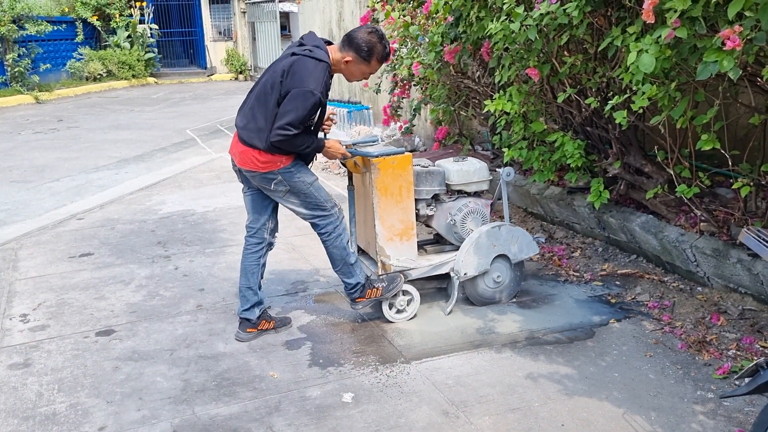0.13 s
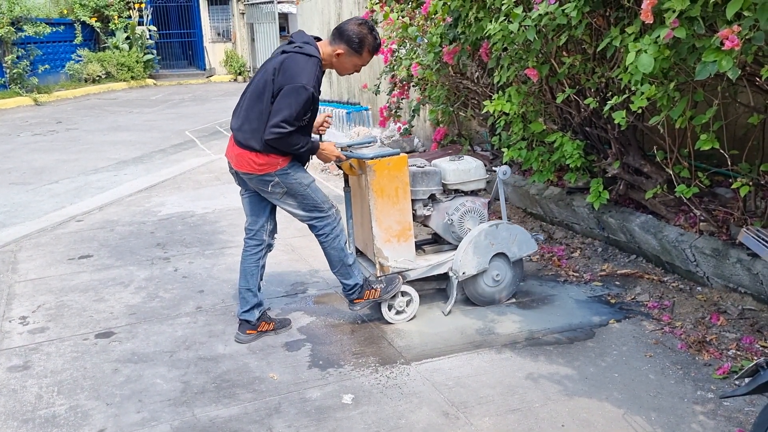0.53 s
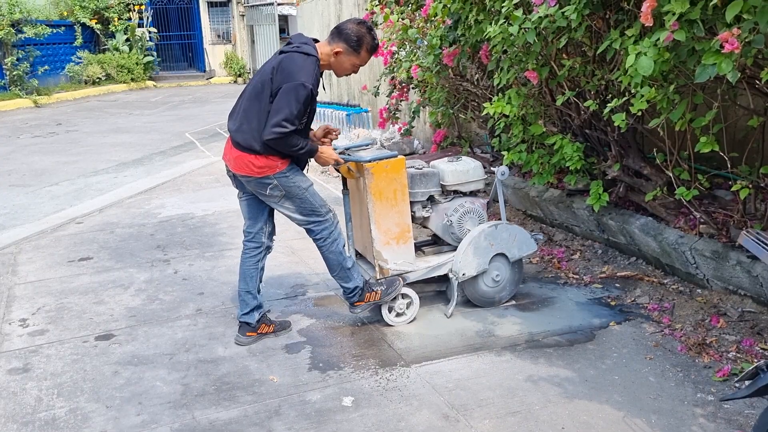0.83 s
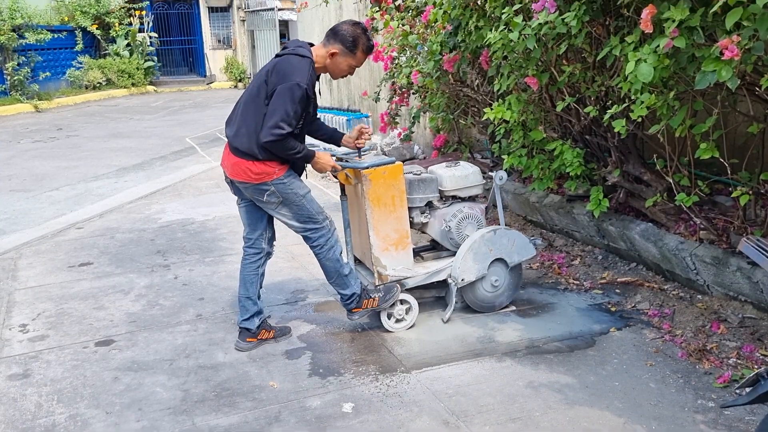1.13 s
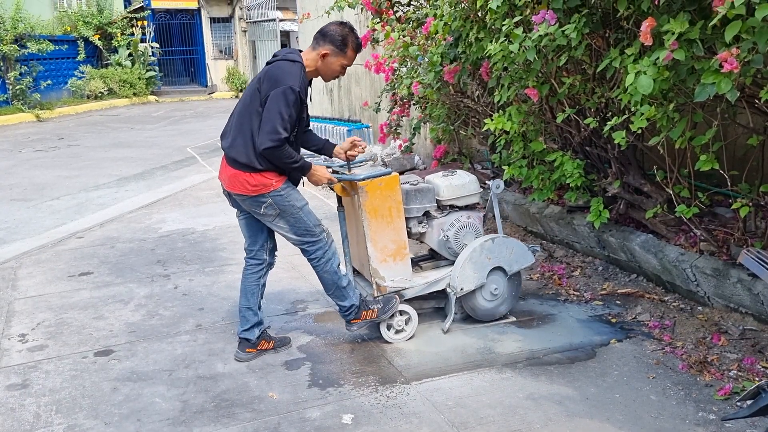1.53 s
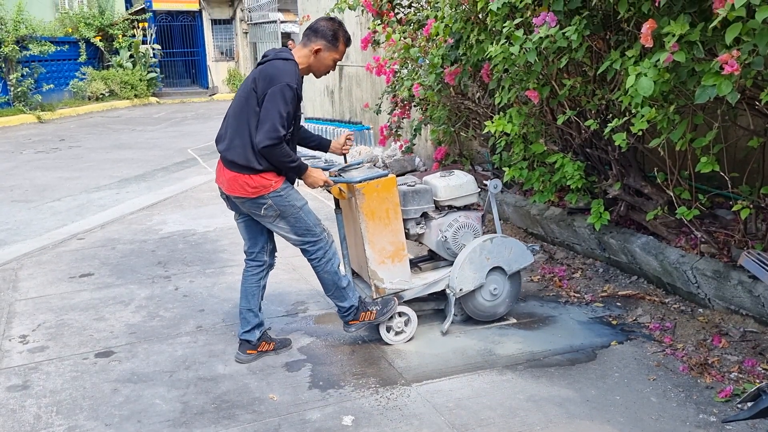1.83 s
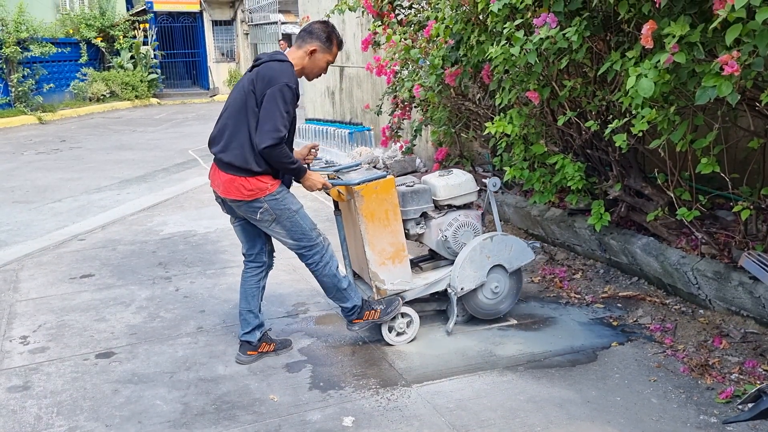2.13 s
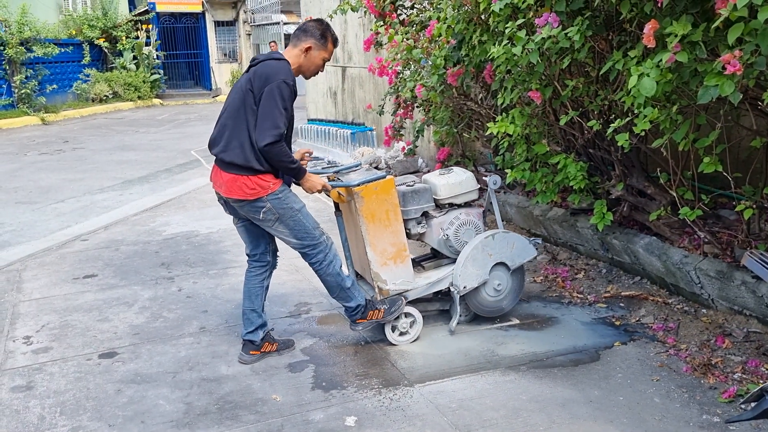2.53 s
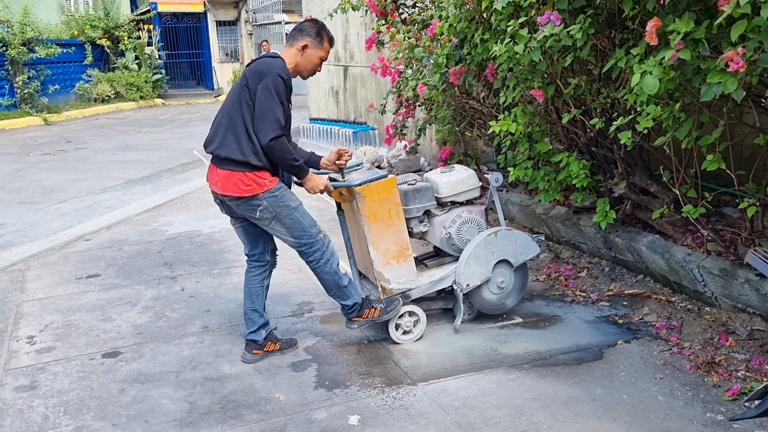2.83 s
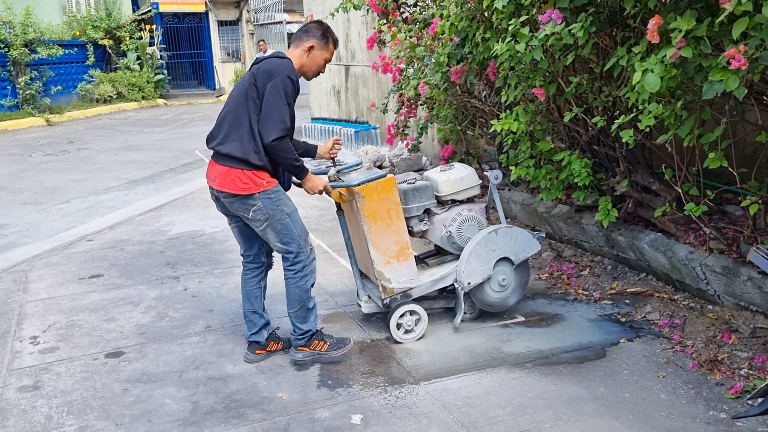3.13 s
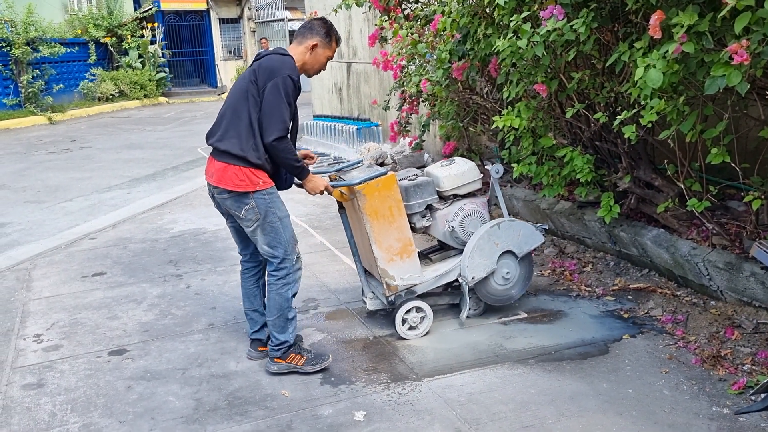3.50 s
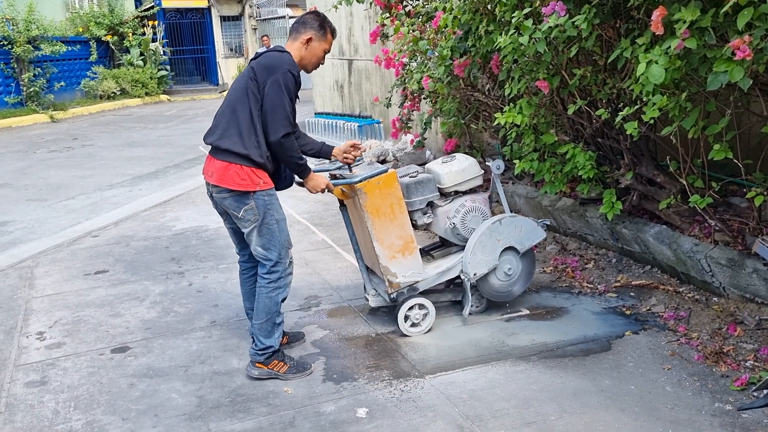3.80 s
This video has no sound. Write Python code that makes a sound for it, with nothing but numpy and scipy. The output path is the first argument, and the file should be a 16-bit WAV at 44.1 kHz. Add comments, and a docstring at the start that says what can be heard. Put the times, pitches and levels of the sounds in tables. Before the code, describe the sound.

A walk-behind concrete saw's small engine drones and roars throughout on an outdoor driveway. Its blade grinds and sings metallically for under a second, then rings out briefly; loose parts rattle. Small stereo camera microphone, gain audibly rising afterwards.

```python
"""A driveway: a walk-behind concrete saw runs, its one-cylinder four-stroke engine droning and roaring.
At first the blade grinds the slab and sings; then it comes free and rings out. Loose parts rattle on top.
Tones are sine partials on the firing cycle and on the blade's modes; roar, grit and rattle are shaped noise.
A two-port pocket camera holds its gain down for the grinding, then brings it back up."""
import sys
import numpy as np
from scipy import signal
from scipy.fft import rfft, irfft, next_fast_len
from scipy.io import wavfile
from scipy.ndimage import uniform_filter1d, minimum_filter1d, map_coordinates

SR = 44100
rng = np.random.default_rng(int(sys.argv[2]) if len(sys.argv) > 2 else 0)


def field_ratio(decibels):
    """Amplitude ratio for a level in dB (20 dB per decade); scalars and array-likes work."""
    return 10 ** (np.asarray(decibels, dtype=float) / 20)


def put_to_file(sound):
    """Save the sound as 16-bit audio at rate SR, in the file named by the first command-line argument."""
    columns = np.atleast_2d(sound).T  # one column per channel
    safe = np.clip(columns, -1, 1)
    whole_steps = np.round(safe * 32767)
    wavfile.write(sys.argv[1], SR, whole_steps.astype(np.int16))


N = 174636
T = np.arange(N) / SR  # seconds
HZ = np.fft.rfftfreq(next_fast_len(N + 8192), 1 / SR)  # frequency grid, padded past the end


def unit(x):
    """Scaled to rms 1."""
    return x / np.sqrt(np.mean(x ** 2) + 1e-20)


def over_time(points):
    """Straight lines through (s, value) points."""
    return np.interp(T, *np.transpose(points))


def over_frequency(points):
    """(Hz, value) points joined on a log frequency axis."""
    hz, value = np.transpose(points)
    return np.interp(np.log(HZ + 1), np.log(hz + 1), value)


def wobble(rate):
    """A smooth random curve, rate knots a second (60 at most)."""
    knots = rng.standard_normal(int(N * 60 / SR) + 4)
    return map_coordinates(knots, [T * min(rate, 60)])


def filtered(x, gain):
    """x times a response on the frequency grid."""
    size = 2 * (len(HZ) - 1)
    return irfft(rfft(x, size) * gain, size)[..., :N]


def noise(gain, patchy_db):
    """Two unrelated noises of one colour, rms 1 together, sharing random loud and soft patches."""
    spectra = signal.stft(rng.standard_normal((2, N)), nperseg=512)[2]
    patches = rng.standard_normal(spectra.shape[1:])
    patches = uniform_filter1d(patches, size=6, axis=0)  # across frequency
    patches = uniform_filter1d(patches, size=12, axis=1)  # across time
    patchy = signal.istft(spectra * field_ratio(patchy_db * unit(patches)), nperseg=512)[1]
    return unit(filtered(patchy[:, :N], gain))


# Engine speed: time_s, firing_rate_hz
FIRING_RATE = [(0.0, 27.37), (0.64, 27.36), (0.76, 27.3), (2.9, 27.53), (3.25, 27.3), (3.82, 27.47),
               (3.96, 27.9)]
# Exhaust and casing tones: order (multiple of the firing rate, played rounded), level_db (rms), shake_db
ENGINE_TONES = [(1, -53, 2), (1.98, -35, 3), (3, -39.5, 4), (4.054, -25.5, 0.5), (5.013, -33.5, 4.5),
                (6, -34, 4), (7.01, -38, 5), (8.02, -36.5, 2), (8.94, -42.5, 5.5), (10.03, -39.5, 1.5),
                (11.08, -46, 0), (20.1, -40, 0), (25.95, -39, 4), (27.15, -37, 4.5), (31, -41.5, 0),
                (33.45, -33.5, 2), (34.5, -33, 3), (45.58, -39, 5), (52, -37, 0.5)]
# Colour of the engine roar: pitch_hz, relative_level_db (per Hz)
ROAR_COLOUR = [(25, -30), (60, -24), (120, -4.5), (170, -7), (230, -6), (300, -7), (420, -12.5),
               (520, -11.5), (720, -1), (900, -3), (1080, -9), (1400, -4), (1650, -13.5), (2070, -12.5),
               (2600, -9.5), (3300, -16.5), (4500, -16.5), (5300, -18), (5700, -22), (6300, -18.5),
               (7800, -17.5), (8300, -20.5), (9300, -29), (13000, -28.5), (16000, -27.5)]
# Casing and guard panels ringing in the roar: pitch_hz, width_hz, lift_db
PANEL_RINGS = [(224.2, 11.8, 12.5), (730, 56, 2.5), (850, 20, 3.5), (1173, 24, 1), (1752, 150, 7.5),
               (2175, 48, 6.5), (2350, 26, 5), (2622, 81, 5.5), (2970, 40, 5.5), (3154, 48, 5.5),
               (3720, 140, 5.5), (4060, 32, 8.5), (4670, 120, 4)]


def engine():
    """Firing orders are unsteady tones; the roar swells with each crank turn and each firing."""
    firings = np.cumsum(over_time(FIRING_RATE)) / SR
    smear = 0.045  # phase in periods per order squared: the muffler smears each firing
    tones = 0
    for multiple, level_db, shake_db in ENGINE_TONES:
        order = round(multiple)
        level = field_ratio(level_db + shake_db * wobble(14)) * 2 ** 0.5  # rms to peak
        phase = 2 * np.pi * (order * firings + smear * order ** 2)
        tones = tones + level * np.sin(phase + 0.14 * shake_db * wobble(10))

    # a four-stroke turns twice for each firing
    turn_db = 1 * np.cos(4 * np.pi * firings)
    firing_db = 0.23 * np.cos(2 * np.pi * firings)
    scatter_db = 0.59 * wobble(55) + 0.4 * wobble(9)
    lift_db = sum(db / (1 + (2 * (HZ - hz) / width) ** 2) for hz, width, db in PANEL_RINGS)
    roar = noise(field_ratio(over_frequency(ROAR_COLOUR) + lift_db), patchy_db=0.73)
    roar = field_ratio(-18 + turn_db + firing_db + scatter_db) * roar
    return tones * [[1], [0]] + roar  # tones only in the row both ports share


# Blade pressure in the cut: time_s, relative_level_db
CUT_PRESSURE = [(0.0, -26.5), (0.066, -24.5), (0.152, -27.5), (0.2, -25), (0.214, -30), (0.286, -25.5),
                (0.476, -30), (0.5, -25), (0.828, -28.5), (0.84, -32)]
# Colour of the grinding: pitch_hz, relative_level_db (per Hz)
GRIND_COLOUR = [(800, -11.5), (1600, -8), (2500, -1.5), (3300, -3.5), (3900, -4.5), (4400, -2.5),
                (4900, -5.5), (5300, 0.5), (5680, -6), (6100, -4), (6700, 4), (7100, -5), (7600, 0),
                (8200, -6), (9000, -7), (12000, -11), (16000, -7.5)]
# Ringing modes of the steel blade: pitch_hz, wander_hz, relative_level_db
BLADE_MODES = [(3035, 8, -12), (3262, 12, -14), (3610, 12, -9), (3785, 14, -15), (4060, 5, 0),
               (4229, 4, -4), (4588, 25, -6), (5092, 10, -9), (5165, 10, -10), (5265, 10, -8),
               (5950, 10, -12), (6235, 7, -9), (6466, 10, -10), (7515, 12, -11), (7693, 12, -14),
               (8430, 12, -13)]
# How hard the blade sings: time_s, relative_level_db
SINGING_FORCE = [(0.0, -30), (0.028, -27), (0.07, -21), (0.19, -22.5), (0.216, -18), (0.516, -23.5),
                 (0.58, -19.5), (0.636, -29), (0.684, -16.5), (0.802, -30), (0.84, -22.5)]


def blade():
    """Grit hisses in the cut and the steel's modes sing, wavering, then ring out once the blade is free."""
    free_s, grind_t60_s, ring_t60_s = 0.839, 0.054, 0.35
    after_s = np.maximum(T - free_s, 0)
    grind_db = over_time(CUT_PRESSURE) + 10.5 - 60 * after_s / grind_t60_s
    grind = field_ratio(grind_db) * noise(field_ratio(over_frequency(GRIND_COLOUR)), patchy_db=1.95)

    modes = 0
    for hz, wander_hz, level_db in BLADE_MODES:
        level = field_ratio(level_db + 3 * wobble(25.7))
        phase = 2 * np.pi * np.cumsum(hz + wander_hz * wobble(29.67)) / SR
        row_drift = [[0], [1]] * wobble(15.08)  # radians, second row only
        modes = modes + level * np.sin(phase + row_drift)
    sing_db = over_time(SINGING_FORCE) + 2 - 60 * after_s / ring_t60_s
    return grind + field_ratio(sing_db) * unit(modes)


def rattle():
    """Loose parts tick unevenly: each tick flares a broad high hiss and a thin flickering ring."""
    ticks_per_s, tick_t60_s = 60, 0.03
    tick_level = field_ratio(7 + 2 * rng.standard_normal(N))
    ticks = (rng.random(N) < ticks_per_s / SR) * tick_level
    decay = field_ratio(-60 * T[:SR // 20] / tick_t60_s)
    flare = 1 + signal.fftconvolve(ticks, decay)[:N]

    highpass = 1 / (1 + (7500 / (HZ + 1)) ** 8)
    hiss = field_ratio(-58 + 3 * wobble(14)) * noise(highpass, patchy_db=2.5)
    ring_hz, half_width_hz = 13777, 90
    narrow = 1 / (1 + ((HZ - ring_hz) / half_width_hz) ** 2)
    ring = field_ratio(-55 + 3 * wobble(6)) * noise(narrow, patchy_db=1.2)
    return flare * (hiss + ring)


# The right port rings at two pipe modes: pitch_hz, left_over_right_db
PORT_BALANCE = [(60, 0.9), (520, -0.36), (860, 2.5), (1200, 0.6), (1700, -4.5), (3000, -4.5), (3300, -9),
                (3750, -14.5), (4400, -18), (4800, -9.5), (5400, -3), (5950, 3), (6700, 6.5), (7750, -7.5),
                (8900, -13.5), (10300, -6.5), (12000, -1), (13900, -7.5), (16000, 2)]
# Left-right likeness: pitch_hz, correlation (1 is identical)
PORT_LIKENESS = [(60, 0.88), (250, 1), (500, 0.7), (720, 1), (1000, 0.55), (1200, 0.22), (1500, 0.42),
                 (3000, 0.4), (3350, 0.52), (3800, 0.62), (4650, 0.66), (5600, 0.14), (6200, 0.64),
                 (7500, 0.11), (10000, 0.41), (16000, 0.22)]
# Phase lead of the left port: pitch_hz, lead_rad
PORT_LEAD = [(200, 0), (800, -0.78), (1100, 0.47), (3400, -1.13), (4100, 1.4), (4600, 1.04), (5500, 3),
             (6000, 1), (8300, 1.5), (9800, 3.5), (12900, 5), (14000, 0.5), (16000, -7)]


def two_ports(sources):
    """Row 0 reaches both ports alike, row 1 in opposite sign; each port has its own colour and phase."""
    # the split between shared and opposed sound sets the likeness
    angle = np.arccos(np.clip(over_frequency(PORT_LIKENESS), -1, 1)) / 2
    mid, side = filtered(sources, [np.cos(angle), np.sin(angle)])
    half_lead = np.exp(0.5j * over_frequency(PORT_LEAD))
    right_gain = field_ratio(-over_frequency(PORT_BALANCE))
    return filtered(np.array([mid + side, mid - side]), [half_lead, right_gain / half_lead])


def scene():
    """Engine, blade and rattle as they reach the two ports."""
    return two_ports(engine() + blade() + rattle())


def gain_control(x):
    """Loud treble trips a fixed gain cut that holds, then lets go; the cut is already on at the start."""
    loud_db, cut_db, hold_s, recover_s = -27, 6.5, 0.95, 0.43
    treble = filtered(x.mean(axis=0), HZ > 6000)
    power = np.abs(uniform_filter1d(treble ** 2, SR // 20))  # 50 ms average
    level_db = 10 * np.log10(power + 1e-12)
    tripped = np.clip((level_db - loud_db) / 3, 0, 1)

    ramp = int(recover_s * SR)
    hold = int(hold_s * SR) + ramp // 2  # the ramp is centred, so it starts half its length early
    padded = np.pad(-tripped, (hold, 0), "constant", constant_values=-1)
    # highest trip over the past hold time
    held = -minimum_filter1d(padded, hold, origin=(hold - 1) // 2)[hold:]
    return x * field_ratio(-cut_db * uniform_filter1d(held, ramp, mode="nearest"))


def soft_clip(x):
    """Peaks bend smoothly towards a ceiling."""
    ceiling, hardness = 0.92, 6
    return x / (1 + np.abs(x / ceiling) ** hardness) ** (1 / hardness)


def low_pass(x):
    """Removes everything above the highest recorded frequency."""
    return signal.sosfilt(signal.butter(12, 17090, fs=SR, output="sos"), x)


def record(dry):
    """The camera rides its gain, stops the treble at 15750 Hz and clips peaks softly."""
    ridden = gain_control(dry)
    mix = soft_clip(filtered(ridden, HZ < 15750))
    return low_pass(mix)


dry = scene()
out = record(dry)
put_to_file(out)
```